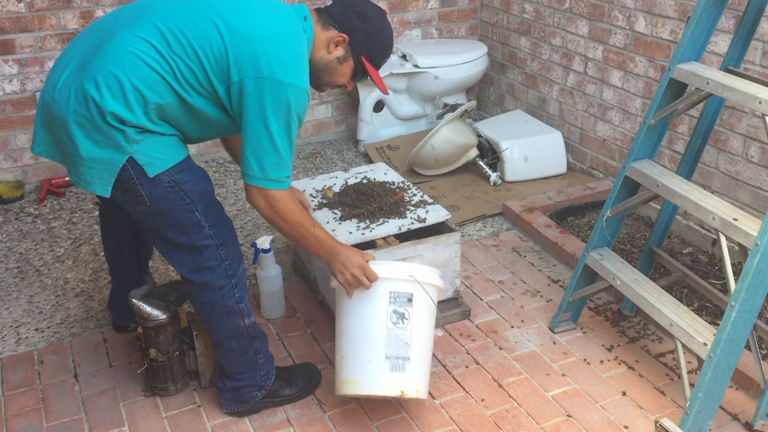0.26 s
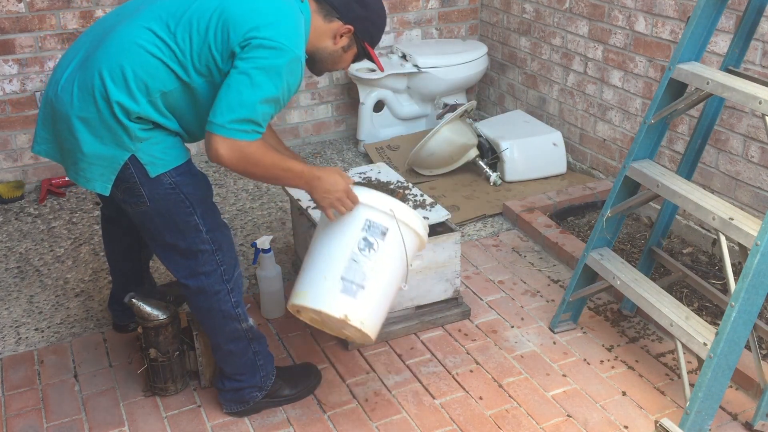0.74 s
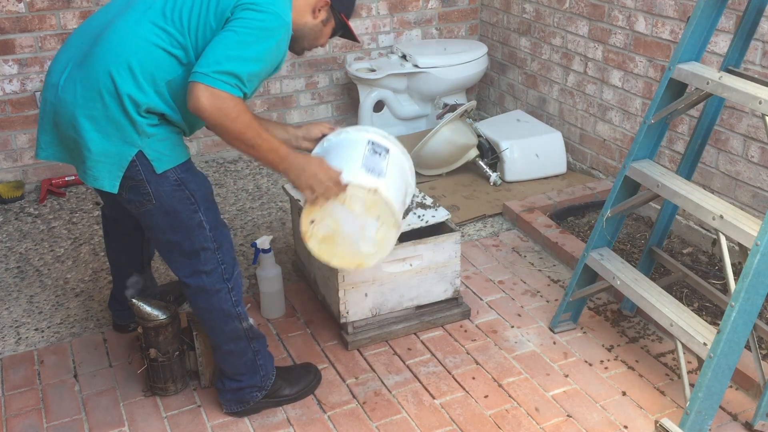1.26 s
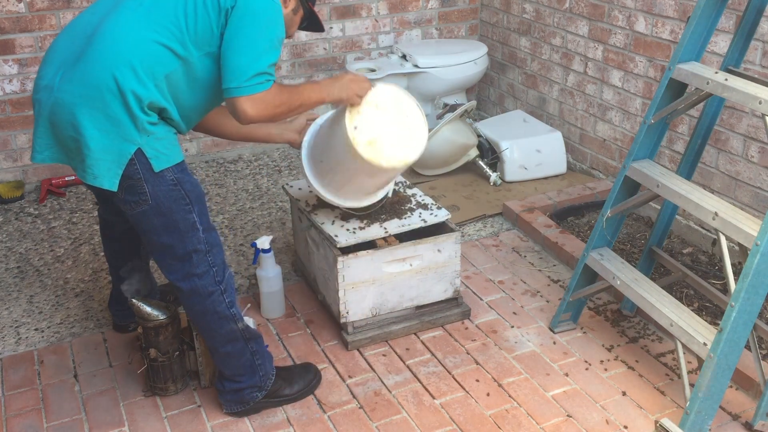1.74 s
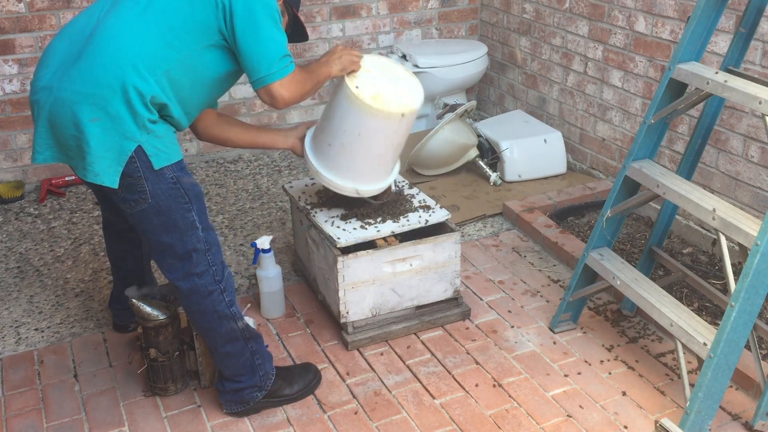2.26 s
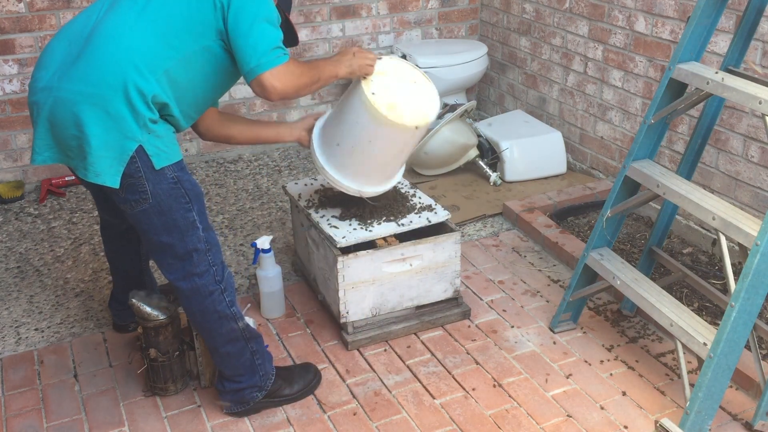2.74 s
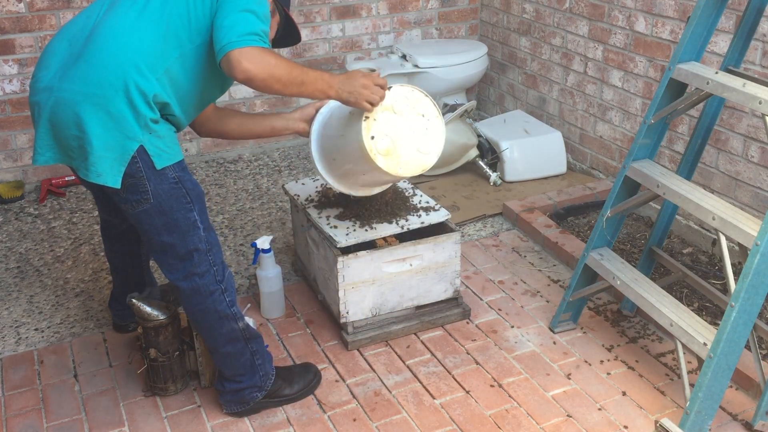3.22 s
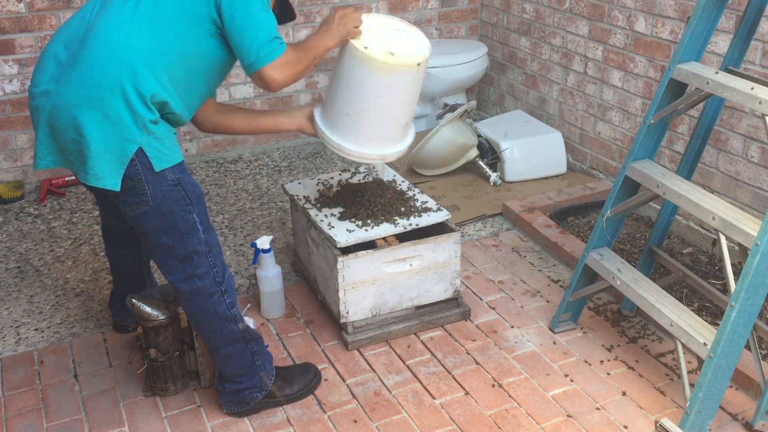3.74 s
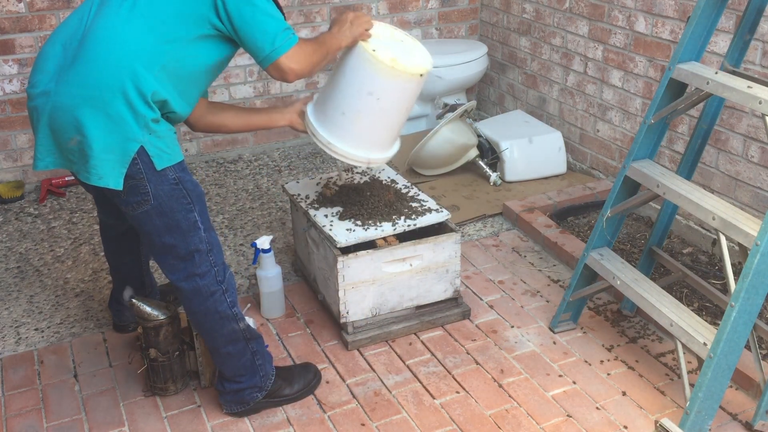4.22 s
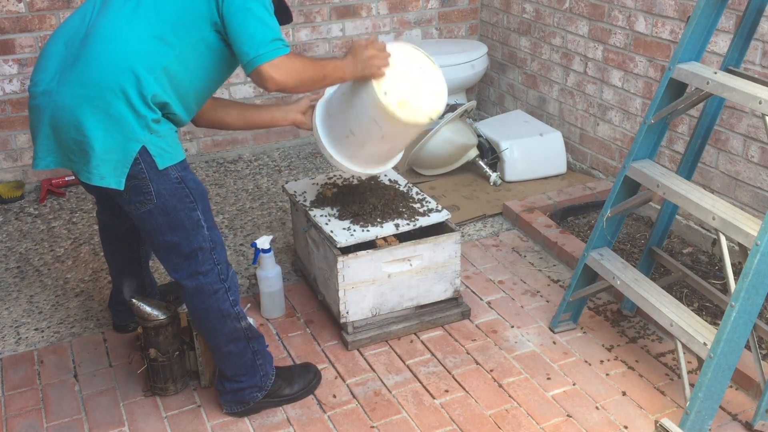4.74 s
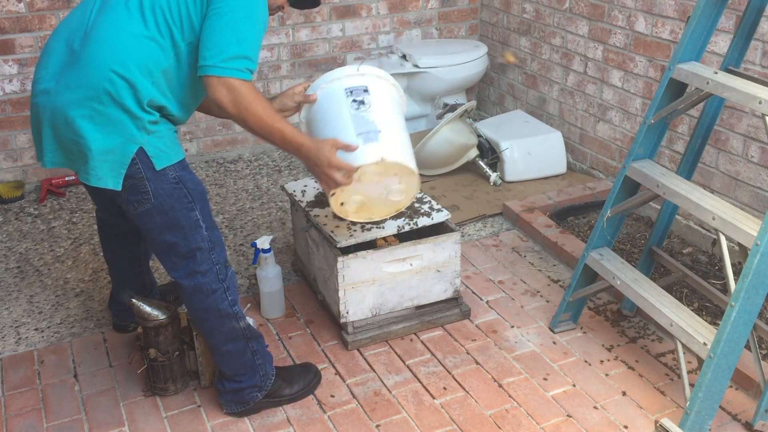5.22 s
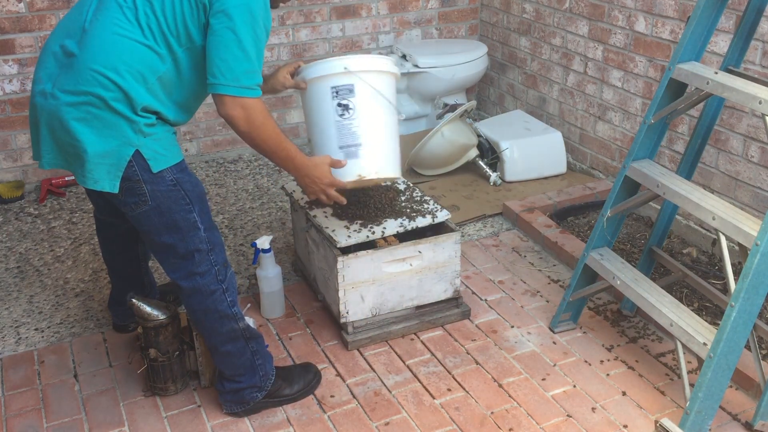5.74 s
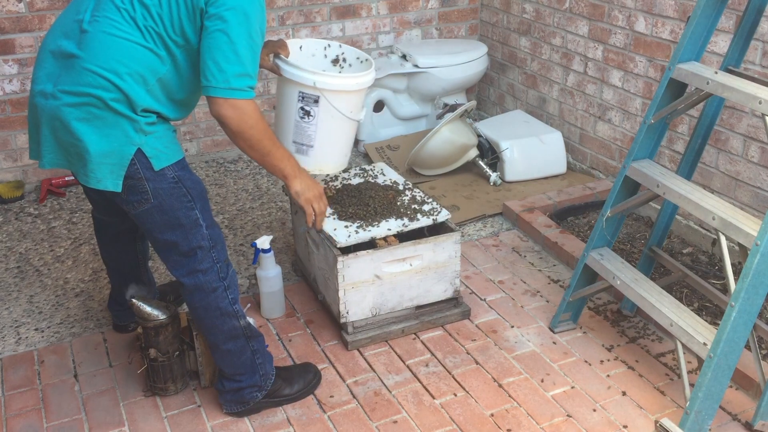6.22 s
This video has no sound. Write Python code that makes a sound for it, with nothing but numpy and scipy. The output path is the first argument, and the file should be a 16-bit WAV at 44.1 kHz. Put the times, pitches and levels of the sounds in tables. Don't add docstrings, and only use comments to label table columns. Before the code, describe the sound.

Two hard booming blows on a plastic bucket, then light cracks and taps over a low swarm hum, with wind bumping the microphone outdoors.

```python
import sys
import numpy as np
from scipy import signal
from scipy.io import wavfile
from scipy.ndimage import uniform_filter1d

SR = 44100
rng = np.random.default_rng(int(sys.argv[2]) if len(sys.argv) > 2 else 0)


def bounce(signal):
    frames = np.transpose(np.atleast_2d(signal))
    limited = np.clip(frames, -1, 1)
    pcm = np.round(limited * 32767).astype(np.int16)
    wavfile.write(sys.argv[1], SR, pcm)


def linear_from_db(decibels):
    return 10 ** (np.asarray(decibels, float) / 20)


N = 285768

# start in seconds, peak in dB, extra level of the rim modes in dB.
FLOOR_BLOWS = [
    (0.0109, -5.0, 4),
    (0.3151, -4.0, -7),
    (5.676, -33, 0),
]
DRUM_HZ, DRUM_S = 224, .004
RIM_HZ = 1300
# frequency in Hz, level in dB, decay time t60 in seconds.
BUCKET_MODES = [(62, -28, 0.36), (113, -13.5, 0.12), (175, -45, 0.28), (345, -23, 0.47), (425, -18.5, 0.16),
                (453, -16, 0.15), (592, -29.5, 0.47), (802, -35, 0.32), (965, -36, 0.26), (1010, -30, 0.31),
                (1233, -31, 0.43), (1360, -28, 0.3), (1390, -22, 0.23), (1820, -28.5, 0.22),
                (2180, -45, .17), (525, -22.5, 0.35)]
# delay in seconds, level in dB.
WALL_ECHOES = [(.0201, -8.0), (.0514, -8.8), (.0660, -11.8), (.0795, -21.7), (.0963, -17.7), (.1190, -14.1),
               (.1453, -23.0), (.1617, -20.2), (.2105, -20.3), (.2501, -30.0), (.2834, -32.0)]
SCATTER_DB, SCATTER_T60_S = -24, .7

# start in seconds, level in dB, ring frequency in Hz,
# first crack over its returns in dB, factor on decay time.
CRACKS = [(.0097, -15, 1430, 1.5, 0.84), (.017, -23, 800, 6, 1.6), (.314, -17.5, 900, -2.5, 0.62),
          (.358, -17, 2540, 5.5, 1.05), (.372, -19, 1370, 3.5, 0.73), (.921, -46, 1360, 0, 1.1),
          (.972, -42.5, 2600, 5.5, 0.74), (1.798, -34.5, 1260, 5, 0.94), (2.109, -37.5, 1100, 10.5, 0.3),
          (2.18, -41, 1650, 10.5, .9), (2.311, -37, 1390, 1.5, 0.68), (2.597, -49, 1340, 0, 4),
          (3.649, -47, 1360, 10, 0.36), (3.867, -42.5, 1900, 0, .83), (3.938, -39.5, 1500, 10, 1.7),
          (4.319, -31, 1490, 4.5, .85), (4.486, -35.5, 1990, 6.5, 1), (4.655, -31.5, 1590, 4.5, 0.73),
          (5.272, -43, 1920, -14, 0.71), (5.391, -49, 1060, 6, .64), (5.661, -16.5, 2570, 1.1, 0.92),
          (5.845, -26, 1290, 4, 1.04), (5.905, -34, 2600, -33, 1.26)]
RING_DB, RING_PER_DB, HARD_DB = 1, .7, -25
# frequency in Hz, level in dB per Hz.
PLASTIC_SPECTRUM = [(320, 20.5), (550, 3), (632, 5), (897, -1), (1190, -2), (1590, 2.5), (1710, 0),
                    (2350, -1), (2670, -0.5), (5070, -17), (15500, -33.5)]
# frequency in Hz, width in Hz, level in dB.
SHELL_MODES = [(800, 43, -21), (983, 78, 9), (1370, 35, 5), (1990, 53, -11), (2600, 97, -16)]
# frequency in Hz, decay time t60 in seconds.
YARD_DECAY = [(150, 1), (500, 0.68), (1500, 0.56), (4000, 0.42), (8000, 0.51), (15000, 0.59)]
# start in seconds, level in dB, decay time t60 in seconds.
HANDLE_TICKS = [
    (.017, -37, .06),
    (.3143, -46, .03),
    (.360, -40, .06),
    (2.108, -52, .03),
    (5.661, -42, .08),
    (5.8447, -50, .05),
    (.3735, -23, .012),
    (.379, -24, .014),
    (.3735, -36, .09),
]

BEAT_HZ, BEAT_SPREAD = 231, .09
# multiple of the beat, level in dB.
WING_HARMONICS = [(1, 6), (2, 1), (3, -4.5), (4, -2), (5, -1), (6, -7), (7, -24), (8, -7), (9, -27),
                  (10, -38), (12, -21)]
# time in seconds, level in dB.
SWARM_LEVEL = [(0.66, -51), (0.79, -58.5), (0.98, -56), (2.04, -56.5), (2.39, -54.5), (2.49, -52),
               (2.72, -54.5), (2.86, -57.5), (3.32, -55), (3.66, -58.5), (3.92, -57), (4.15, -56.5),
               (4.91, -54), (5.34, -57.5), (5.83, -53), (6.07, -55), (6.48, -54)]
SWARM_DB, SURGE_DB, SURGES_PER_S = 3.5, 2.5, 12
# time in seconds, wing beat in Hz, level in dB.
PASSING_BEE = [
    (6.221, 305, -65),
    (6.29, 345, -57),
    (6.36, 331, -47),
    (6.42, 293, -59),
    (6.47, 285, -70),
]

# centre in seconds, peak in dB, frequency in Hz.
WIND_BUMPS = [(0.714, -26.5, 93), (.731, -47, 57), (.765, -32.5, 62), (0.788, -45, 55.5), (1.094, -40, 68),
              (2.878, -37, 93.5), (3.306, -39, 93), (3.455, -45, 86.5), (3.485, -31, 62.6),
              (3.626, -39, 86), (3.697, -36, 70), (3.743, -37.5, 80), (3.8, -39, 106), (4.163, -43, 52),
              (4.196, -21.5, 104), (4.213, -25.5, 69), (4.276, -40, 57), (4.298, -33, 78), (4.334, -36, 70),
              (4.624, -33, 138), (4.646, -27.5, 84), (4.688, -34, 82.5), (4.774, -41, 77.4),
              (4.792, -27, 91), (5.003, -41, 85), (5.428, -42, 81), (5.683, -33, 106), (6.06, -40, 94),
              (6.219, -40, 83.4), (6.471, -39, 62)]
BUMP_CYCLES, CYCLES_PER_DB = .48, .012
# time in seconds, level in dB.
WIND_LEVEL = [
    (0.0, -46),
    (0.4, -50.5),
    (1.77, -56.5),
    (2.35, -53.5),
    (2.67, -63),
    (3.7, -55),
    (3.86, -53),
    (4.58, -63),
    (4.73, -56),
    (6.48, -55.5),
]
# frequency in Hz, level in dB per Hz.
WIND_SPECTRUM = [(12, -63), (20, -11), (59, 27), (86, -15.5), (125, 28.5), (146, -71), (200, -2), (260, 9),
                 (440, -120)]

# time in seconds, hiss level in dB.
STIR_LEVEL = [(0.7, -62.5), (1.42, -63), (1.75, -63.5), (2.65, -57.5), (3.26, -62), (3.66, -62.5),
              (4.13, -59.5), (4.51, -57.5), (4.74, -57.5), (5.29, -61.5), (5.71, -62.5), (5.83, -61.5),
              (6.01, -61.5), (6.48, -61)]
CALM_DB = -61.5
HISS_DB, WASH_DB, WASH_PER_DB, RUSTLE_DB, RUSTLE_PER_DB = 0.4, -50, 0.7, -66, 2.5
# blow in seconds, wash level in dB, rustle level in dB.
YARD_ANSWERS = [
    (.011, -41.5, -50.5),
    (.33, -42, -45.5),
    (5.7, -58, -47.5),
]
RETURN_PEAK_S = 0.13
# frequency in Hz, level in dB per Hz.
WASH_SPECTRUM = [(82, -11.5), (140, -3.5), (240, -12), (330, -15), (470, -6.5), (600, -15.5), (750, -13),
                 (1340, -11.5), (2200, -19), (2750, -23.5), (5000, -42.5), (7000, -74)]
# frequency in Hz, level in dB per Hz.
HISS_SPECTRUM = [(2060, -25), (3500, -2), (4500, -2.5), (5000, -5), (5600, -1), (7560, -3.5), (8860, -1),
                 (10300, -6), (11200, -4.5), (15600, -2.5), (16200, -12)]
# frequency in Hz, level in dB per Hz.
RUSTLE_SPECTRUM = [(1200, -58), (2000, 4), (3000, 3.5), (4200, -6.5), (6000, -44)]

SPECKLE = .36
LIMIT, EDGE_HZ = 0.83, 15800


def evened(x):
    return x / np.sqrt(np.mean(x ** 2) + 1e-20)


def read(points, hz):
    f, value = np.transpose(points)
    return np.interp(np.log(hz + 1), np.log(f + 1), value)


def level_curve(table):
    s, db = np.transpose(table)
    return np.interp(np.arange(N) / SR, s, db)


def add(mix, s, sound):
    part = mix[max(round(s * SR), 0):][:len(sound)]
    part += sound[:len(part)]


def drift(count, per_s):
    knots = rng.standard_normal((count, 400))
    at = np.arange(N) / SR * per_s
    k = at.astype(int)
    blend = .5 - .5 * np.cos(np.pi * (at - k))
    return knots[:, k] * (1 - blend) + knots[:, k + 1] * blend


def noise(spectrum, patchy_db, flicker_db, size=1024):
    frames = 4 * N // size + 5
    hz = np.fft.rfftfreq(size, 1 / SR)
    real, imag, patches = rng.standard_normal((frames, len(hz), 3)).T
    patches = uniform_filter1d(patches, size=14, axis=0)
    patches = evened(uniform_filter1d(patches, size=12, axis=1))
    flicker = evened(uniform_filter1d(rng.standard_normal(frames), size=5))
    level_db = read(spectrum, hz)[:, None] + patchy_db * patches + flicker_db * flicker
    z = (real + 1j * imag) * linear_from_db(level_db)
    return evened(signal.istft(z, nperseg=size, noverlap=size * 3 // 4)[1][:N])


def thumps():
    t, out = np.arange(SR // 2) / SR, np.zeros(N)
    boom_t = t[:2200]
    u = boom_t / DRUM_S
    boom = np.sin(2 * np.pi * DRUM_HZ * boom_t) * (u / 2) ** 2 * np.exp(2 - u)
    for s, db, rim_db in FLOOR_BLOWS:
        ringing = np.zeros(len(t))
        for hz, mode_db, t60 in BUCKET_MODES:
            envelope = linear_from_db(mode_db + rim_db * (hz > RIM_HZ) - 60 * t / t60)
            ringing += envelope * np.sin(2 * np.pi * hz * t)
        add(out, s, linear_from_db(db) * ringing * np.minimum(t / 0.0047, 1))
        taps = rng.standard_normal(len(t)) * (rng.random(len(t)) < 150 / SR) * (t > .03)
        scatter = signal.fftconvolve(taps * linear_from_db(-60 * t / SCATTER_T60_S), boom)
        add(out, s, linear_from_db(db + SCATTER_DB) * scatter)
        for delay, wall_db in [(0.00067, 0)] + WALL_ECHOES:
            add(out, s + delay, linear_from_db(db + wall_db) * boom)
    return out


def crack(ring_hz, ring_db, first_db, decay):
    taps = rng.standard_normal(SR) * (rng.random(SR) < .4)
    f, t, z = signal.stft(taps, SR, nperseg=512, noverlap=384)
    power = linear_from_db(2 * read(PLASTIC_SPECTRUM, f)) / (1 + (700 / (f + 1)) ** 6)
    ring_width = 0.77 * ring_hz * linear_from_db(-.35 * max(ring_db, 0))
    for mode_hz, width, db in SHELL_MODES + [(ring_hz, ring_width, ring_db)]:
        power = power + linear_from_db(2 * db) / (1 + (2 * (f - mode_hz) / width) ** 2) ** 2
    late = np.maximum(t - .025, 0)
    t60 = (max(decay, .05) * read(YARD_DECAY, f))[:, None]
    z *= np.sqrt(power)[:, None] * linear_from_db(-60 * late / t60)
    uneven = uniform_filter1d(rng.standard_normal(z.shape), size=2, axis=0)
    uneven = uniform_filter1d(uneven, size=10, axis=1)
    z *= linear_from_db(1.8 * evened(uneven))
    sound = signal.istft(z, SR, nperseg=512, noverlap=384)[1]
    t = np.arange(len(sound)) / SR
    first = np.minimum(t / 0.00012, 1) * linear_from_db(first_db * np.exp(-t / 0.014))
    return first * sound / np.sqrt(np.mean(sound[:1300] ** 2))


def cracks():
    out = np.zeros(N)
    for s, db, ring_hz, first_db, decay in CRACKS:
        ring_db = RING_DB + RING_PER_DB * (HARD_DB - db)
        add(out, s, linear_from_db(db - 12.0) * crack(ring_hz, ring_db, first_db, decay))
    return out


def handle_ticks():
    out, t = np.zeros(N), np.arange(6000) / SR
    bright = signal.butter(2, [8000, 15000], "bp", fs=SR, output="sos")
    for s, db, t60 in HANDLE_TICKS:
        fizz = signal.sosfilt(bright, rng.standard_normal(len(t)))
        add(out, s, linear_from_db(db - 60 * t / t60) * fizz)
    return out


def swarm(count=28):
    own_hz = BEAT_HZ * (1 + BEAT_SPREAD * np.linspace(-np.sqrt(2), np.sqrt(2), count))[:, None]
    wander = 1 + .04 * drift(count, 7.6) + 0.0195 * drift(count, 45.0)
    turns = np.cumsum(own_hz * wander, axis=1) / SR + rng.random((count, 1))
    phase = 2 * np.pi * np.arange(512) / 512
    cycle = sum(linear_from_db(db) * np.cos(k * phase + k * k) for k, db in WING_HARMONICS)
    near = linear_from_db(4.5 * drift(count, 10.5))
    hum = evened((near * cycle[(turns % 1 * 512).astype(int)]).sum(0))
    surge = SURGE_DB * drift(1, SURGES_PER_S)[0]
    return linear_from_db(level_curve(SWARM_LEVEL) + SWARM_DB + surge) * hum


def passing_bee():
    s, hz, db = np.transpose(PASSING_BEE)
    t = np.arange(s[0], s[-1], 1 / SR)
    flutter = evened(uniform_filter1d(rng.standard_normal(len(t)), size=500))
    turns = np.cumsum(np.interp(t, s, hz) * (1 + 0.1 * flutter)) / SR
    wings = np.sin(2 * np.pi * turns) + 0.22 * np.sin(4 * np.pi * turns)
    out = np.zeros(N)
    add(out, s[0], linear_from_db(np.interp(t, s, db)) * wings)
    return out


def wind():
    out = linear_from_db(level_curve(WIND_LEVEL) - 1.5) * noise(WIND_SPECTRUM, 1.6, 1.2, size=2048)
    t = np.arange(-1500, 1500) / SR
    for s, db, hz in WIND_BUMPS:
        half_width = (BUMP_CYCLES - CYCLES_PER_DB * (db + 25)) / hz
        bump = -np.sin(2 * np.pi * hz * t) * np.exp(-.5 * (t / half_width) ** 2)
        add(out, s + t[0], linear_from_db(db - 2.5) * bump)
    return out


def yard_answer(column):
    answers = np.array(YARD_ANSWERS)
    u = np.maximum(np.arange(N) / SR - answers[:, :1], 0) / RETURN_PEAK_S
    return (linear_from_db(answers[:, column, None]) * (u * np.exp(1 - u)) ** 3).sum(0)


def rustle(stir):
    gain = np.hypot(linear_from_db(RUSTLE_DB + RUSTLE_PER_DB * stir), yard_answer(column=2))
    return gain * noise(RUSTLE_SPECTRUM, 2.3, 2.2, size=512)


def hiss(stir):
    return linear_from_db(CALM_DB + HISS_DB + stir) * noise(HISS_SPECTRUM, 1.0, 0.98)


def wash(stir):
    gain = np.hypot(linear_from_db(WASH_DB + WASH_PER_DB * stir), yard_answer(column=1))
    return gain * noise(WASH_SPECTRUM, 1.2, 1.0)


def scene():
    stir = level_curve(STIR_LEVEL) - CALM_DB
    bucket = thumps() + cracks() + handle_ticks()
    insects = swarm() + passing_bee()
    background = wind() + rustle(stir) + hiss(stir) + wash(stir)
    return (bucket + insects + background)[None]


def denoise(x):
    z = signal.stft(x, nperseg=1024, noverlap=768)[2]
    power = uniform_filter1d(abs(z) ** 2, size=2, axis=-1) + 1e-20
    contrast = power / uniform_filter1d(power, size=15, axis=-2)
    lift = np.minimum(contrast, 4) ** (SPECKLE / 2)
    lift[:, :10] = 1
    return signal.istft(z * lift, nperseg=1024, noverlap=768)[1][:, :N]


def roll_off(x):
    return signal.sosfilt(signal.butter(12, 16800, fs=SR, output="sos"), x)


def record(dry):
    rolled_off = signal.sosfilt(signal.butter(4, 36, "hp", fs=SR, output="sos"), dry)
    x = denoise(rolled_off)
    x = LIMIT * np.tanh(x / LIMIT)
    band_limit = signal.firwin(511, EDGE_HZ, window=("kaiser", 9), fs=SR)
    mix = signal.oaconvolve(x, band_limit[None], "same")
    return roll_off(mix)


dry = scene()
out = record(dry)
bounce(out)
```